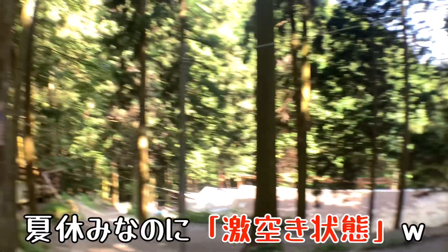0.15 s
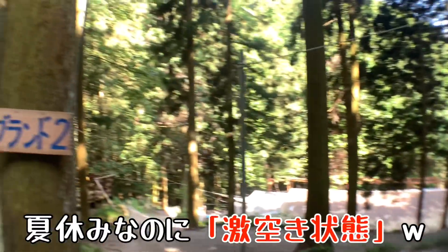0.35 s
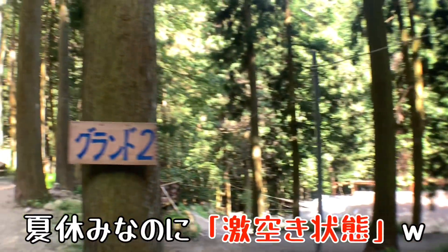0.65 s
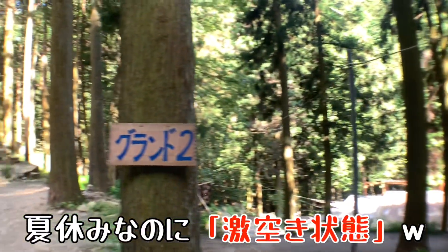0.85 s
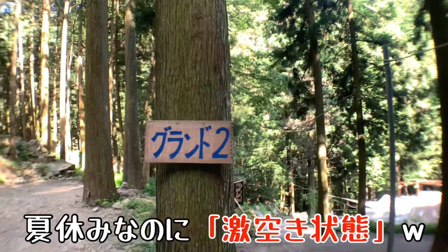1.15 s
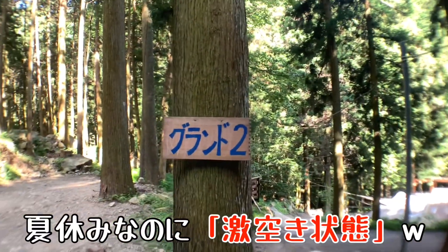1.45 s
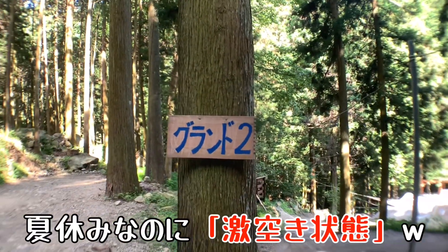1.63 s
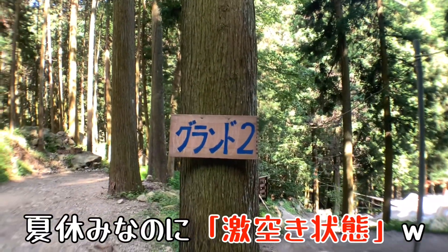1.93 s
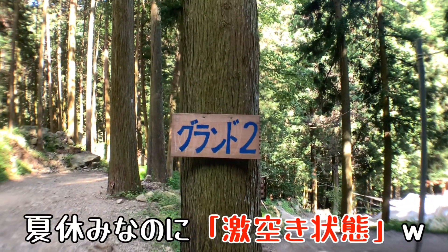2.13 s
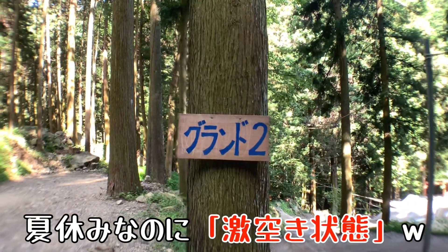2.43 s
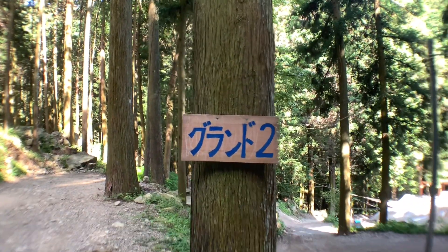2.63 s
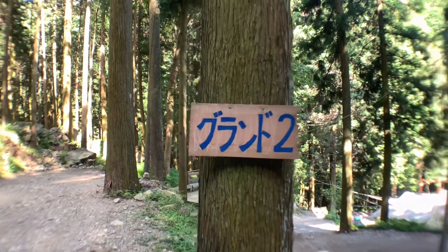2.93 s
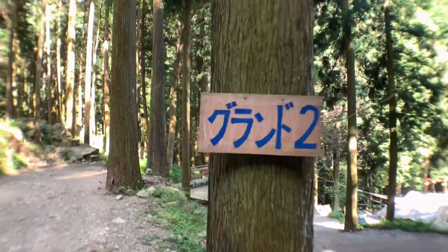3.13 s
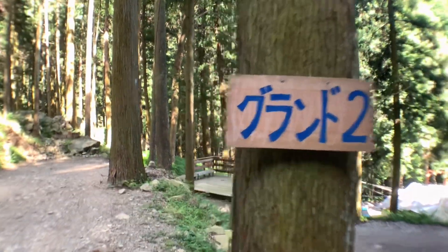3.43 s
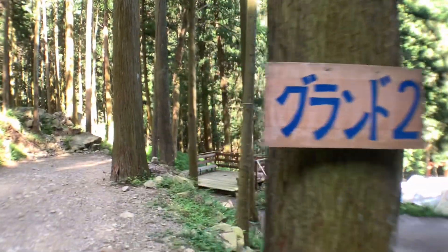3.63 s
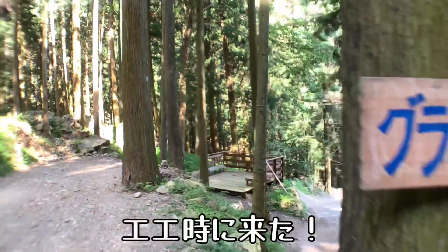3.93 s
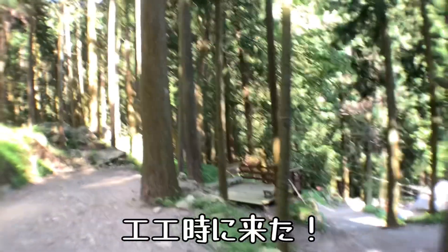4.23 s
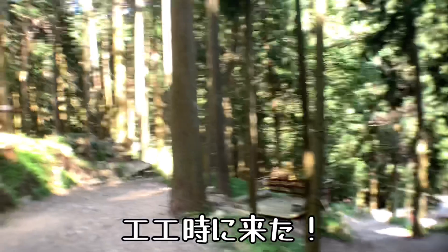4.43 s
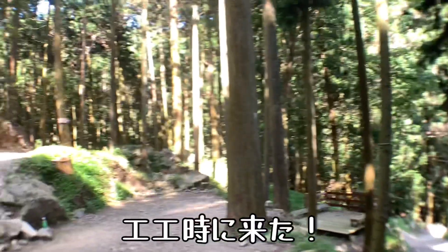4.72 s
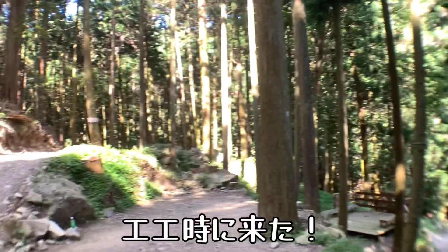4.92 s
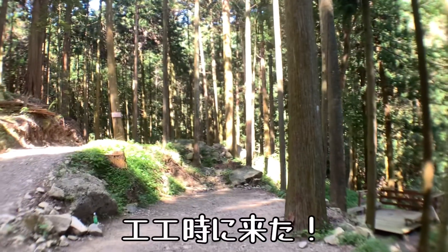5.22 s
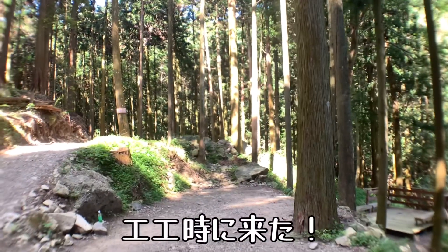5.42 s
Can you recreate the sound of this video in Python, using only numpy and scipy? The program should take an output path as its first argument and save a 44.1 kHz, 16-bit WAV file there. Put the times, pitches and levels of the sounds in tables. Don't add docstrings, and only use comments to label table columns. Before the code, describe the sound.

A near cicada holds a steady, bright, very high buzz, with a still higher insect rattling in fast throbs and a softer chorus hissing on the right. Someone walks slowly on gravel close below the handheld stereo camera microphone: stones knock, grit crunches, heels thump dully. A faint bird whistles once near the start. Outdoor woodland, dry and open, with quiet air and a low rumble.

```python
import sys
import numpy as np
from scipy import signal
from scipy.fft import rfft, irfft, next_fast_len
from scipy.io import wavfile
from scipy.ndimage import uniform_filter1d, map_coordinates

SR = 44100
rng = np.random.default_rng(int(sys.argv[2]) if len(sys.argv) > 2 else 0)


def gain_from_db(level_db):
    decades = np.asarray(level_db, float) / 20
    return 10 ** decades


def to_wav(s):
    ch = np.atleast_2d(s).T
    pcm = np.round(np.clip(ch, -1, 1) * 32767)
    wavfile.write(sys.argv[1], SR, pcm.astype(np.int16))


N = 245637


def unit(x):
    return x / np.sqrt(np.mean(x ** 2) + 1e-20)


def along(points, hz):
    f, v = np.transpose(points)
    return np.interp(np.log(hz + 1), np.log(f + 1), v)


def curves(rows):
    s, *cols = np.transpose(rows)
    return [np.interp(np.arange(N) / SR, s, c) for c in cols]


def wobble(rate):
    knots = rng.standard_normal(int(N * rate / SR) + 4)
    return map_coordinates(knots, [np.arange(N) * rate / SR])


def filtered(x, response):
    m = next_fast_len(N + 8192)
    return irfft(rfft(x, m) * response(np.fft.rfftfreq(m, 1 / SR)), m)[..., :N]


def coloured(x, spectrum):
    inside = lambda hz: (hz > spectrum[0][0]) & (hz < spectrum[-1][0])
    return unit(filtered(x, lambda hz: gain_from_db(along(spectrum, hz)) * inside(hz)))


def pair(gate, alike):
    turn = lambda hz: np.arccos(np.clip(alike(hz), -1, 1)) / 2
    noises = gate * rng.standard_normal((2, N))
    mid, side = filtered(noises, lambda hz: np.array([np.cos(turn(hz)), np.sin(turn(hz))]))
    return np.array([mid + side, mid - side])


def clicks(rate_hz, drift, decay, scatter_db):
    cycle = np.cumsum(rate_hz * (1 + drift * wobble(4))) / SR
    size = gain_from_db(scatter_db * rng.standard_normal(int(cycle[-1]) + 1))
    return unit(size[cycle.astype(int)] * np.exp(-(cycle % 1) / decay))


def ports(x):
    lag_s, lag_turn = .000208, .285
    half = lambda hz: np.exp(1j * np.pi * (hz * lag_s - lag_turn))
    return filtered(x, lambda hz: np.array([1 / half(hz), half(hz)]))


def cicadas():
    # (time [s], level [dB])
    near_levels = [(0, -45), (.5, -45), (1.5, -43.5), (1.95, -44), (2.5, -44), (3.5, -45), (4.1, -46),
                   (4.33, -46.5), (4.62, -44.5), (5.57, -44)]
    # (time [s], level [dB])
    far_levels = [(0, -52.5), (1.2, -54), (2.3, -55), (3.5, -55), (4.08, -56), (4.33, -59), (4.62, -58),
                  (5, -60.5), (5.57, -59)]
    # (frequency [Hz], level [dB per Hz])
    buzz_spectrum = [(5500, -40), (6500, -18), (7300, -7), (8000, 0), (8300, 0), (8700, -1.5), (9200, -6),
                     (10000, -15), (10800, -26), (12000, -32), (16000, -40)]
    # (frequency [Hz], level [dB per Hz])
    far_spectrum = [(3800, -30), (4400, -11), (4800, -4.5), (5100, -4.5), (5800, 1.5), (6100, 3),
                    (6700, 4.5), (7400, 4.5), (9000, -50)]
    buzz_db, = curves(near_levels)
    far_db, = curves(far_levels)

    click_train = clicks(506, drift=.002, decay=.3, scatter_db=1.5)
    plates = gain_from_db(-6.5) * pair(click_train, lambda hz: .95 + 0 * hz)
    crowd = pair(gain_from_db(.7 * wobble(12)), lambda hz: .94 + 0 * hz)
    near = gain_from_db(buzz_db + 6.0) * ports(coloured(plates + crowd, buzz_spectrum))

    hiss = pair(gain_from_db(1.15 * wobble(5.5)), lambda hz: along([(5400, -0.041), (6400, 0.54)], hz))
    to_right = gain_from_db([[-3], [3]])
    far = gain_from_db(far_db + 7.5) * coloured(hiss * to_right, far_spectrum)
    return near + far


def rattle():
    # (time [s], level [dB])
    levels = [(0, -63), (.72, -60.5), (.8, -59.5), (3.1, -59), (3.8, -58.5), (4.28, -62), (4.4, -73),
              (4.5, -69), (4.59, -64), (4.72, -57.5), (4.89, -59.5), (5.04, -63), (5.57, -66.5)]
    # (time [s], shift [cycles])
    beat_drift = [(0, -.03), (1, -.19), (1.7, -.27), (2.3, -.2), (3.1, -.25), (3.8, -.15), (4.3, -.2),
                  (4.6, -.01), (5.2, .16), (5.57, .18)]
    # (frequency [Hz], level [dB per Hz])
    shrill_spectrum = [(10000, -30), (11200, -7), (12300, -5), (13200, -2.5), (13900, 0), (14300, -2),
                       (15000, -9), (15700, -11), (16500, -20)]
    throb_hz = 15.8
    level_db, = curves(levels)
    beat = throb_hz * np.arange(N) / SR + curves(beat_drift)[0]
    teeth = 1.1 + clicks(147.3, drift=.008, decay=.06, scatter_db=3.5)
    # head start [cycles], lowest and highest frequency [Hz], steady part [dB]
    bands = [(.2, 9000, 12400, 9), (.09, 12400, 13500, 2), (0, 13500, 17000, 1.5)]
    sound = 0
    for lead, low_hz, high_hz, steady_db in bands:
        swell = (1 + np.tanh(3 * (np.cos(2 * np.pi * (beat + .04 + lead)) + .1))) / 2
        gate = gain_from_db(steady_db) + unit(teeth * swell * gain_from_db(1.5 * wobble(12)))
        voice = unit(pair(gate, lambda hz: .85 + 0 * hz))
        sound = sound + filtered(voice, lambda hz: (hz >= low_hz) & (hz < high_hz))
    return gain_from_db(level_db + 6.0) * ports(coloured(sound, shrill_spectrum))


def stones():
    # (time [s], peak level [dB], pitch [Hz], sharp overtone [dB])
    knocks = [(0.303, -35.5, 980, -31), (0.576, -31.5, 1120, -15), (0.816, -48, 790, -6),
              (0.835, -33.5, 1250, -16), (1.545, -31, 1170, -3), (1.552, -48, 1930, -5),
              (1.737, -34.5, 1070, -12), (2.83, -42, 1350, -16), (2.84, -39.5, 636, -10),
              (3.115, -39.5, 1110, -19), (3.562, -34, 1100, -36), (3.573, -35.5, 1100, -10.5),
              (3.585, -43.5, 1450, -17), (3.652, -37.5, 1190, -18), (3.687, -38.5, 1810, -18),
              (4.146, -47, 1080, -23), (4.19, -39, 1240, -28), (4.199, -39.5, 1140, -29),
              (4.204, -43.5, 1100, -25), (4.298, -41, 1150, -28), (4.354, -38.5, 1190, -20),
              (4.374, -44, 980, -20), (4.381, -39, 1170, -16), (4.391, -38, 794, -5), (4.418, -46, 860, -9),
              (4.569, -44, 930, -12), (4.828, -48, 1300, -25), (5.14, -45, 727, -20),
              (5.162, -40, 1260, -22), (5.186, -37, 730, -11)]
    out = np.zeros((2, N + SR))
    t = np.arange(SR // 16) / SR
    shape = lambda peak_s: t / peak_s * np.exp(1 - t / peak_s)
    tone = lambda f: np.sin(2 * np.pi * (f * t + rng.random()))
    for s, db, hz, sharp_db in knocks + pebbles():
        thud_db = 3 + 20 * np.log10(weight(s)) - db + 1.5 * rng.standard_normal()
        scuff_db = -59.5 + 0.36 * (db + 46) - db + 1.5 * rng.standard_normal()

        ring = tone(hz) + gain_from_db(-10.5) * tone(1.43 * hz) + gain_from_db(-11) * tone(0.666 * hz)
        sharp = gain_from_db(sharp_db) * tone(rng.uniform(1910, 2460))
        snap = gain_from_db(sharp_db - 5) * shape(0.00021) * (tone(1520) + tone(3630))
        thud = gain_from_db(thud_db + 10) * shape(0.0012) * tone(rng.uniform(176, 405))
        ringing = [1, -2 * .9 * np.cos(2 * np.pi * hz / SR), .9 ** 2]
        grit = signal.lfilter([1], ringing, rng.standard_normal((3, len(t))))
        scuff = gain_from_db(scuff_db) * shape(0.0086) * unit(grit[:2] + grit[2])

        knock = shape(0.001) * (ring + sharp) + snap + thud + scuff
        out[:, round(s * SR):][:, :len(t)] += gain_from_db(db - 3.0) * knock * gain_from_db([[-.8], [.8]])
    return out[:, :N]


def pebbles(count=8):
    # (time [s], length [s], level [dB], rate [stones a second])
    slips = [
        (0.794, .07, -46, 55),
        (2.838, .08, -49, 29),
        (3.566, .035, -46, 43),
        (3.679, .04, -48, 61),
        (4.25, .04, -48, 41),
        (4.356, .05, -42, 49),
        (4.461, .1, -47, 29),
        (5.122, .13, -48, 55),
        (5.298, .27, -47, 15),
    ]
    rows = []
    for s, length, db, rate in slips:
        for k, (late, size, pitch) in enumerate(rng.random((count, 3))):
            if k + late < length * rate:
                hz = 1150 * 2 ** (.9 * (pitch - .5))
                rows.append((s + (k + late) / rate, db + 6 * (size - .5), hz, -30))
    return rows


def weight(t):
    # (time [s], level [dB])
    heels = [(.62, -64.5), (.81, -62), (1.3, -78), (1.87, -71), (2.6, -87), (2.95, -60), (3.24, -62.5),
             (3.58, -61.5), (4.05, -61), (4.58, -70), (5.2, -66), (5.43, -59)]
    thump_s, rumble_db = 0.041, -66.5
    thumps = sum(gain_from_db(db + 0.5) * np.exp(-abs(t - s) / thump_s) for s, db in heels)
    return gain_from_db(rumble_db) + thumps


def bird():
    # (time [s], pitch [Hz], level [dB])
    whistle = [(0.424, 3700, -64), (0.44, 3750, -59), (0.46, 3880, -61), (0.472, 3950, -66),
               (0.49, 4150, -60), (0.515, 3950, -61), (0.53, 3900, -70)]
    hz, level_db = curves(whistle)
    t = np.arange(N) / SR
    fade_s = 0.0054
    on = np.clip(np.minimum(t - whistle[0][0], whistle[-1][0] - t) / fade_s, 0, 1)
    warbled_hz = hz + 40 * wobble(150)
    husky = (1 + .6 * wobble(70)) * np.sin(2 * np.pi * np.cumsum(warbled_hz) / SR)
    return on * gain_from_db(level_db - 6) * husky * gain_from_db([[2], [-2]])


def ground():
    # (time [s], hold [s], grit level [dB])
    soles = [
        (.05, 1, -50.5),
        (1.7, .05, -63),
        (2.763, 0.22, -61.5),
        (3.195, 0.073, -50.5),
        (3.706, 0.055, -51),
        (4.017, 0.069, -67),
        (4.4, 0.37, -54.5),
        (4.844, 0.17, -68),
        (5.15, 0.6, -49),
    ]
    # (frequency [Hz], level [dB per Hz])
    grit_spectrum = [(250, -9), (600, -13.5), (1150, -11.5), (1700, -15), (2600, -15.5), (4000, -17.5),
                     (5000, -43)]
    # (frequency [Hz], level [dB per Hz])
    air_spectrum = [(21, -53), (35, -9), (112, -2), (172, -8.5), (259, -12), (287, -12), (574, -10),
                    (1080, -7.5), (1590, -10), (1730, -13.5), (2300, -12), (3750, -14.5), (4600, -12),
                    (5980, -28.5), (10100, -120)]
    # (frequency [Hz], likeness [0-1])
    air_alike = [(40, .7), (130, .88), (500, .55), (1200, .55), (2000, .25), (3000, 0)]
    press_s, lift_s = 0.15, 0.21
    t = np.arange(N) / SR
    press = 0
    for s, hold, db in soles:
        rise_and_fall = np.minimum((t - s) / press_s, (s + hold - t) / lift_s)
        press = press + gain_from_db(db) * np.exp(np.minimum(0, rise_and_fall))

    grains = (rng.random(N) < 900 / SR) * gain_from_db(3 * rng.standard_normal(N).clip(-2, 2))
    grains = grains * gain_from_db(2.5 * wobble(25))
    grains = signal.lfilter([1], [1, -.97], grains)
    grit = press * gain_from_db(-14) * coloured(pair(grains, lambda hz: 0.37 + 0 * hz), grit_spectrum)

    air = pair(1, lambda hz: along(air_alike, hz)) * gain_from_db([[-.4], [.4]])
    air = coloured(air, air_spectrum)
    low = filtered(air, lambda hz: 1 / (1 + (hz / 420) ** 4))
    rumble = weight(t) * gain_from_db(wobble(14)) * unit(low)
    return grit + rumble + gain_from_db(-62) * unit(air - low)


def scene():
    return cicadas() + rattle() + bird() + stones() + ground()


def joint(x, size=12):
    # (frequency [Hz], level [dB])
    weaker = [(7000, -20), (8200, -12.5), (8900, -12.5), (9600, -9), (10300, -4), (11700, -2.5),
              (12800, -8.5), (13700, -8.5), (14300, -9), (15000, -4.5), (15300, 0)]
    hz, _, z = signal.stft([x[0] + x[1], x[0] - x[1]], SR, nperseg=2048)
    edges = np.arange(0, len(hz), size)
    power = uniform_filter1d(np.add.reduceat(abs(z) ** 2, edges, axis=1), size=3, axis=2)
    keep = power > power[::-1] * gain_from_db(2 * along(weaker, hz[edges]))[:, None]
    kept = z * keep[:, np.arange(len(hz)) // size]
    mid, side = signal.istft(kept, SR, nperseg=2048)[1][:, :N]
    return np.array([mid + side, mid - side]) / 2


def roll_off(x):
    return signal.sosfilt(signal.butter(12, 16730, fs=SR, output="sos"), x)


def record(dry):
    banded = filtered(dry, lambda hz: (hz < 15760) * hz ** 2 / (hz ** 2 + 40 ** 2))
    mid = banded.mean(axis=0)
    wide = mid + gain_from_db(1.2) * (banded - mid)
    return roll_off(joint(wide))


dry = scene()
out = record(dry)
to_wav(out)
```